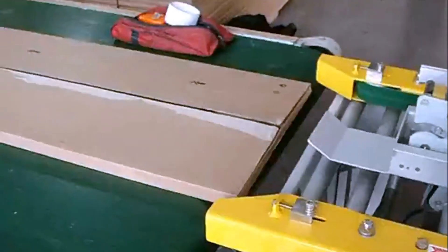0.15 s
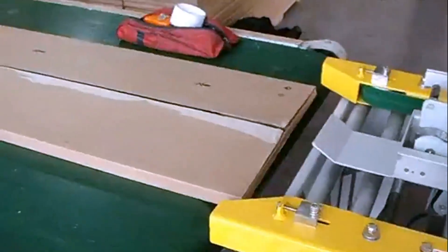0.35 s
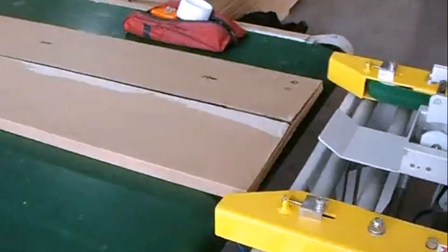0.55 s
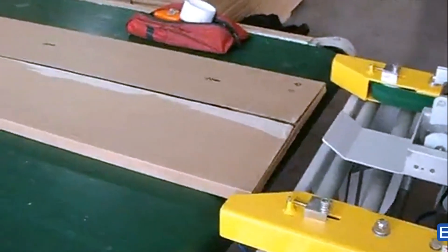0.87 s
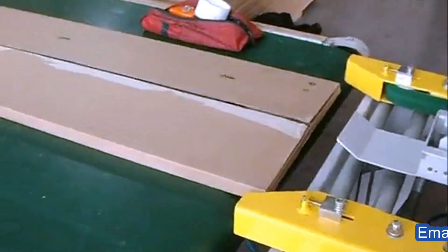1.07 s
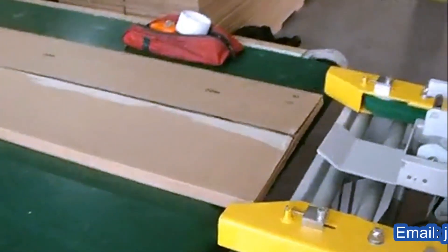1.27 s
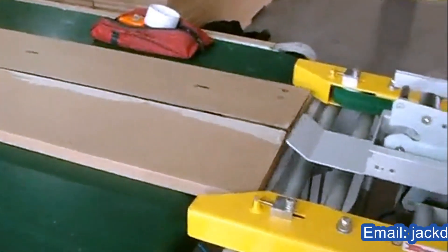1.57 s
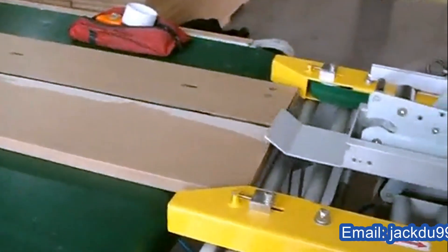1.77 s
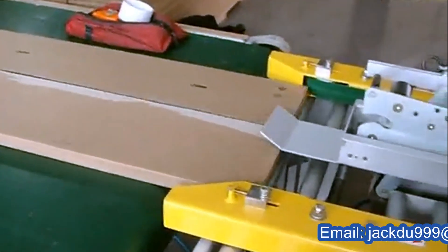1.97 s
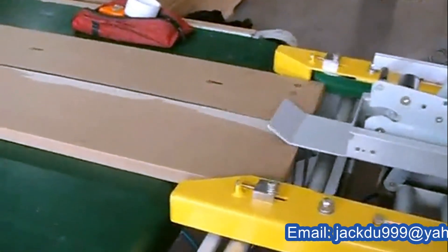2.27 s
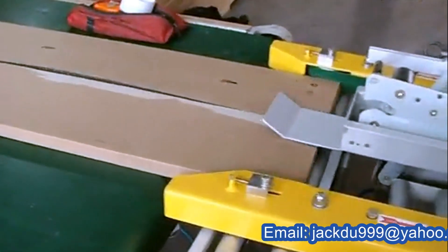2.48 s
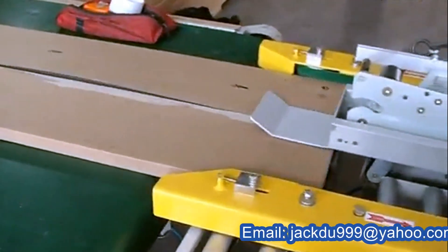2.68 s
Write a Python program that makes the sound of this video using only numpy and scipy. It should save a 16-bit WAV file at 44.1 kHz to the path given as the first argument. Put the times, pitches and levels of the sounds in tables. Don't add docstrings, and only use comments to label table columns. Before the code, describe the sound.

A carton sealing machine hums and roars steadily, its motors and conveyor belts whirring up close

```python
import sys
import numpy as np
from scipy import signal
from scipy.fft import rfft, irfft, next_fast_len
from scipy.io import wavfile
from scipy.ndimage import uniform_filter1d, map_coordinates

SR = 44100
rng = np.random.default_rng(int(sys.argv[2]) if len(sys.argv) > 2 else 0)


def materialize(psi):
    bounded = np.clip(np.atleast_2d(psi).T, -1, 1)
    quanta = np.round(bounded * 32767).astype(np.int16)
    wavfile.write(sys.argv[1], SR, quanta)


def rack_gain(trim_db):
    fader = np.asarray(trim_db, float)
    return 10 ** (fader / 20)


N = 124803


def unit(x):
    return x / np.sqrt(np.mean(x ** 2) + 1e-20)


def along(points, hz):
    f, v = np.transpose(points)
    return np.interp(np.log(hz + 1), np.log(f + 1), v)


def wobble(rate):
    return map_coordinates(rng.standard_normal(N // 20), [np.arange(N) * rate / SR])


def filtered(x, response):
    m = next_fast_len(N + 8192)
    return irfft(rfft(x, m) * response(np.fft.rfftfreq(m, 1 / SR)), m)[..., :N]


def window(start, length, edge):
    t = np.arange(N) / SR - start
    return np.clip(np.minimum(t, length - t + edge) / edge, 0, 1)


def ports(shared, other):
    # frequency in Hz, level of the unshared part in dB re the shared sound.
    apart = [(30, -8), (150, -17), (400, -27), (1000, -20), (2000, -15), (4000, -9), (5800, -4), (8300, -9),
             (11000, -8)]
    # frequency in Hz, left minus right level in dB.
    lean = [(30, -2.5), (200, -.4), (500, 0), (3500, 0), (6400, 1.2), (11500, 1)]
    # frequency in Hz, phase by which the left port leads in radians.
    lead = [(3500, 0), (4900, -0.4), (5800, -0.31), (6300, -0.73), (7600, -0.97), (8100, -0.21), (11600, 0)]

    def both_ports(hz):
        left = rack_gain(along(lean, hz) / 2) * np.exp(.5j * along(lead, hz))
        return np.array([left, 1 / left])

    side = filtered(other, lambda hz: rack_gain(along(apart, hz)))
    return filtered(shared, both_ports) + np.array([side, -side])


def rush(response, patchy_db, grit=0):
    z = signal.stft(rng.standard_normal((2, N)) + grit, nperseg=512)[2]
    field = rng.standard_normal(z.shape[1:])
    field = uniform_filter1d(field, size=5, axis=0)
    field = uniform_filter1d(field, size=12, axis=1)
    pair = signal.istft(z * rack_gain(patchy_db * unit(field)), nperseg=512)[1][:, :N]
    return unit(filtered(pair, response))


def tone(hz, db, wobble_db, blur_hz):
    pitch = hz + blur_hz * wobble(25)
    strength = np.sqrt(2) * rack_gain(db + wobble_db * wobble(8.89))
    return strength * np.sin(2 * np.pi * (np.cumsum(pitch) / SR + rng.random()))


def drive(rows):
    s, hz, db = np.transpose(rows)
    t = np.arange(N) / SR
    return tone(np.interp(t, s, hz), np.interp(t, s, db), wobble_db=0.22, blur_hz=0.53)


def motors():
    # time in seconds, pitch in Hz, level in dB.
    main_gear = [(0.16, 327.5, -26), (0.28, 327.5, -23), (0.64, 326.6, -26.5), (0.71, 326.2, -21),
                 (0.74, 327.6, -26.5), (0.79, 326.5, -21), (1.28, 328.6, -25), (1.51, 327.6, -17.5),
                 (1.59, 327.3, -35), (1.65, 328.1, -26), (2.09, 326.2, -21), (2.11, 326.1, -33.5),
                 (2.36, 327.9, -19.5), (2.62, 325.8, -29), (2.64, 326.6, -24), (2.66, 329, -53),
                 (2.68, 326.9, -29.5), (2.82, 320, -22)]
    # time in seconds, pitch in Hz, level in dB.
    second_gear = [(.16, 343, -36), (.55, 343, -35), (.8, 343, -29), (1.15, 344, -30), (1.55, 343, -40),
                   (1.72, 345, -30), (2.0, 343, -30), (2.2, 343, -40), (2.7, 343, -29), (2.82, 341, -30)]
    # pitch in Hz, level in dB, wobble in dB, blur in Hz.
    hum = [(198.4, -37, 1.5, .1), (584, -37, 0, 5.75), (827, -40, 5, 8.9), (1003, -36.5, 2.5, 3.7),
           (1038, -38, -5, 4.3), (1102, -43.5, 4.5, 2.2), (1645, -36, 1.5, 7.77), (53.3, -51.5, 4.5, 4.6)]
    # pitch in Hz, level in dB, wobble in dB, blur in Hz.
    whine = [(4670, -56, 2, 3), (6178, -56, 2, 2), (7907, -61, 2, 1), (8096, -51, 1.5, .5),
             (8618, -62, 2, 6)]
    gears = drive(main_gear) + drive(second_gear)
    sound = gears + sum(tone(*row) for row in hum) + sum(tone(*row) for row in whine)
    return ports(sound, sound)


def belts():
    # frequency in Hz, density in dB per Hz.
    rumble_hz = [(12, -50), (20, -41), (50, -16.5), (100, -15), (170, -9.5), (240, -12.5), (300, -5),
                 (420, -12.5), (1100, -120)]
    roar_hz = [(240, -11), (400, -3.5), (588, -3.5), (617, -3.5), (1010, -4), (1090, -6.5), (1200, -6),
               (2040, -2), (4000, -16.5), (5200, -44), (8800, -120)]
    hiss_hz = [(2100, -22), (3500, -7), (4250, 0.5), (5500, -5), (6700, -6), (7900, -11.5), (8400, -9),
               (11300, -12), (12000, -38.5), (15000, -120)]
    # resonance in Hz, width in Hz, lift in dB.
    frame = [(322, 98, 2.5), (570, 75, 0.5), (980, 72, 2.5), (1238, 160, 3), (1640, 100, -1.5),
             (2090, 300, -1.5)]
    rattles_per_s, rattle_db, rattle_spread_db = 700, -9, 10
    rumble_db, roar_db, hiss_db = -28.5, -19.5, -31.5

    def panels(hz):
        return sum(lift / (1 + ((hz - c) / width * 2) ** 2) for c, width, lift in frame)

    hits = rng.random((2, N)) < rattles_per_s / SR
    force = rack_gain(rattle_spread_db * rng.random((2, N))) * rng.choice([-1, 1], (2, N))
    chatter = rack_gain(rattle_db) * unit(hits * force)

    rumble = rush(lambda hz: rack_gain(along(rumble_hz, hz) + panels(hz)), patchy_db=-1.7)
    roar = rush(lambda hz: rack_gain(along(roar_hz, hz) + panels(hz)), patchy_db=0.63, grit=chatter)
    hiss = rush(lambda hz: rack_gain(along(hiss_hz, hz)), patchy_db=0.64, grit=.6 * chatter)
    mix = rack_gain(rumble_db) * rumble + rack_gain(roar_db) * roar + rack_gain(hiss_db + 0.27 * wobble(2.34)) * hiss
    return ports(*(rack_gain(0.88 * wobble(6.9)) * mix))


def squeaks():
    # start in seconds, length in seconds, pitch in Hz, level in dB.
    bursts = [(.18, .22, 5825, -48), (.85, .1, 5825, -46), (.98, .3, 5825, -48), (1.56, .16, 5825, -40.5),
              (1.73, .2, 5825, -42), (2.2, .07, 5297, -36), (2.29, .06, 5297, -49), (2.36, .08, 5297, -37),
              (2.48, .09, 5297, -39.5), (2.6, .17, 5297, -45)]
    edge_s, width_hz, side_db = .03, 14, -3

    def grain(c):
        noise = rng.standard_normal(N)
        return unit(filtered(noise, lambda hz: 1 / (1 + ((hz - c) / width_hz) ** 2)))

    sound = np.zeros(N)
    for start, length, c, db in bursts:
        sing = tone(c, db - 1, wobble_db=1, blur_hz=10) + rack_gain(db - 9) * grain(c)
        sound += window(start, length, edge_s) * sing
    return ports(sound, rack_gain(side_db) * np.roll(sound, 2))


def valve():
    # frequency in Hz, density in dB per Hz.
    vent_hz = [(1470, -41), (2500, -3), (3820, -19), (4220, -3), (7170, -5.5), (10500, -4), (11900, -19),
               (15500, -53), (22000, -120)]
    peak_s, rise_s, fall_s, level_db = 0.51, 0.17, 0.11, -30
    t = np.arange(N) / SR - peak_s
    swell = -(t / rise_s) ** 2 / 2
    decay = -(np.abs(t) / fall_s) ** 1.4 / 2
    flow = np.exp(np.where(t < 0, swell, decay))
    air = rush(lambda hz: rack_gain(along(vent_hz, hz)), patchy_db=.6)
    return ports(*(rack_gain(level_db + .8 * wobble(20)) * flow * air))


def rubbing():
    # start in seconds, length in seconds, level in dB.
    rubs = [
        (1.862, .045, -40),
        (1.91, .04, -46),
        (1.955, .08, -42),
        (1.22, .12, -48),
        (2.05, .6, -50),
    ]
    centre_hz, width_hz = 8650, 550
    stroke = sum(rack_gain(db) * window(start, length, edge=.01) for start, length, db in rubs)
    scrape = rush(lambda hz: 1 / (1 + ((hz - centre_hz) / width_hz) ** 4), patchy_db=.8)
    return ports(*(stroke * rack_gain(1.5 * wobble(60)) * scrape))


def scene():
    return motors() + belts() + squeaks() + valve() + rubbing()


def narrow(x):
    # frequency in Hz, share of time a band has no width.
    narrowed = [(300, 0), (450, .95), (1400, .96), (2200, .72), (3200, .45), (4200, .05), (10000, .02),
                (11400, .9)]
    # frequency in Hz, level in dB re the band below which a line vanishes.
    faintest = [(300, -22.5), (1500, -12), (3000, -8), (5500, -7.5), (7300, -3), (8100, -7.5),
                (10500, -7.5), (11600, -2.5)]
    gap_hz, gap_width_hz, gap_share, gap_from_s = 8330, 260, .85, .65
    band_bins, top_hz = 16, 11720

    hz, t, (mid, side) = signal.stft(np.array([x[0] + x[1], x[0] - x[1]]) / 2, SR, nperseg=2048)
    band = np.arange(len(hz)) // band_bins
    centre = (band[:, None] + .5) * band_bins * hz[1]
    in_gap = (abs(centre - gap_hz) < gap_width_hz) * (t > gap_from_s)
    share = along(narrowed, centre) + gap_share * in_gap
    chance = np.repeat(rng.random((band[-1] + 1, len(t))), 2, axis=1)[band, :len(t)]

    band_level = np.sqrt(uniform_filter1d(abs(mid) ** 2, size=band_bins, axis=0) + 1e-20)
    floor = band_level * rack_gain(along(faintest, hz))[:, None]
    both = np.array([mid, side * (chance >= share)])
    heard = abs(both) > floor * rack_gain([[[0]], [[-5]]])
    top = np.where(hz < top_hz, 1, rack_gain(-12))[:, None]
    mid, side = signal.istft(top * both * heard, SR, nperseg=2048)[1][:, :N]
    return np.array([mid + side, mid - side])


def roll_off(x):
    return signal.sosfilt(signal.butter(12, 12090, fs=SR, output="sos"), x)


def record(dry):
    open_s, rise_s = .1395, .004
    gate = np.clip((np.arange(N) / SR - open_s) / rise_s, 0, 1) ** 2
    return roll_off(narrow(dry) * gate)


dry = scene()
out = record(dry)
materialize(out)
```